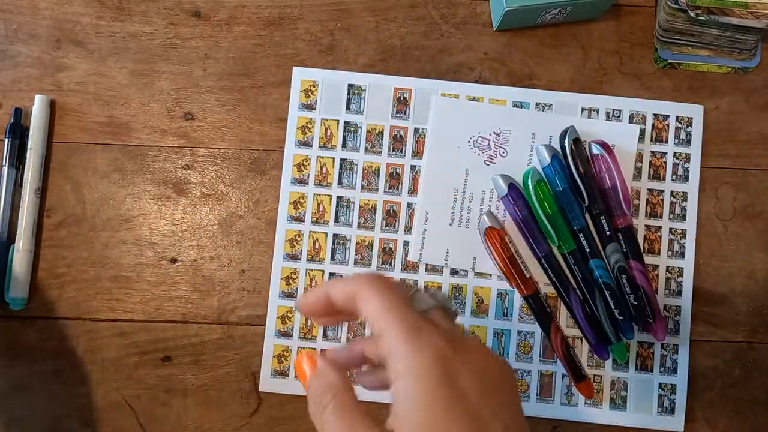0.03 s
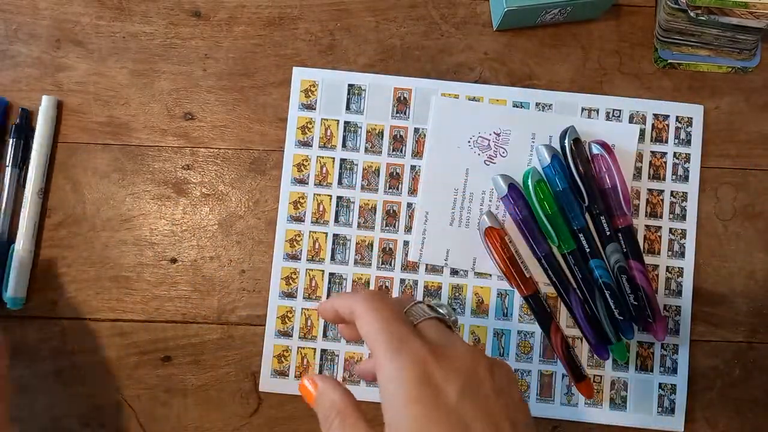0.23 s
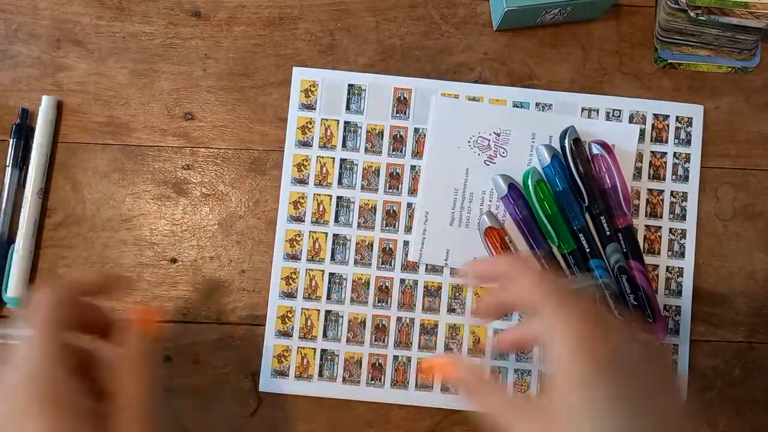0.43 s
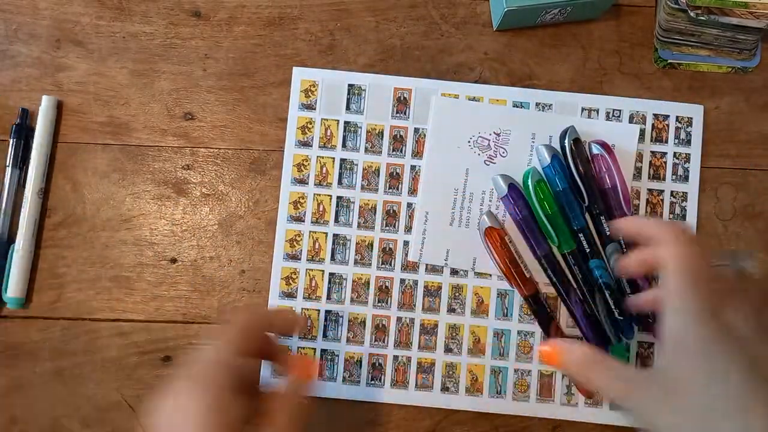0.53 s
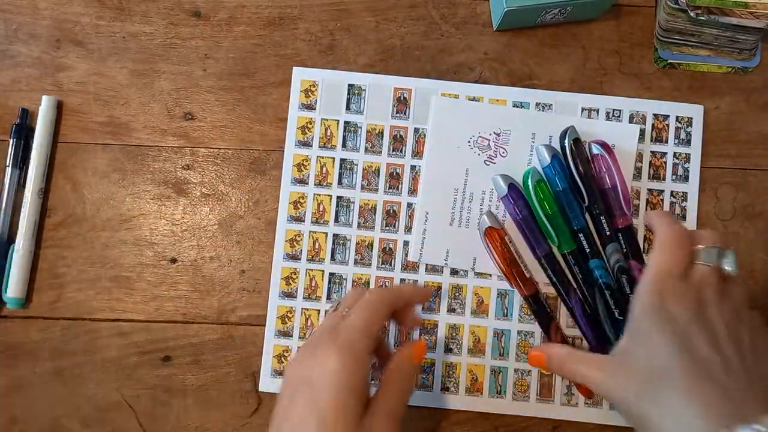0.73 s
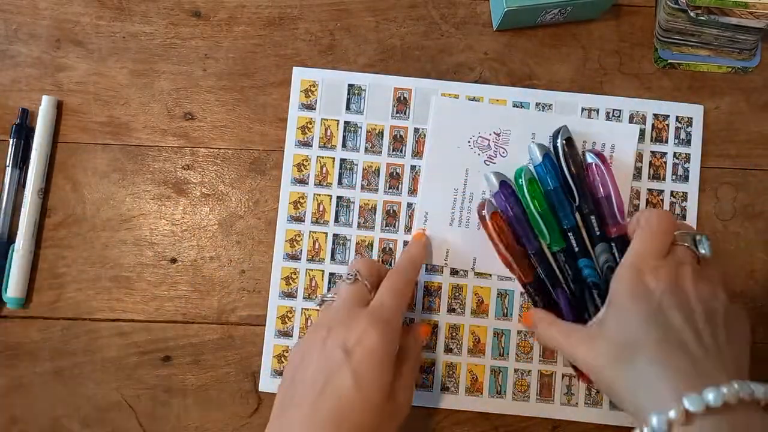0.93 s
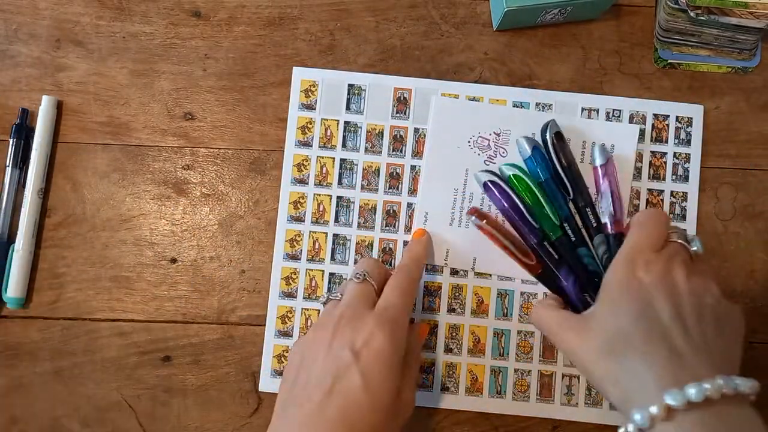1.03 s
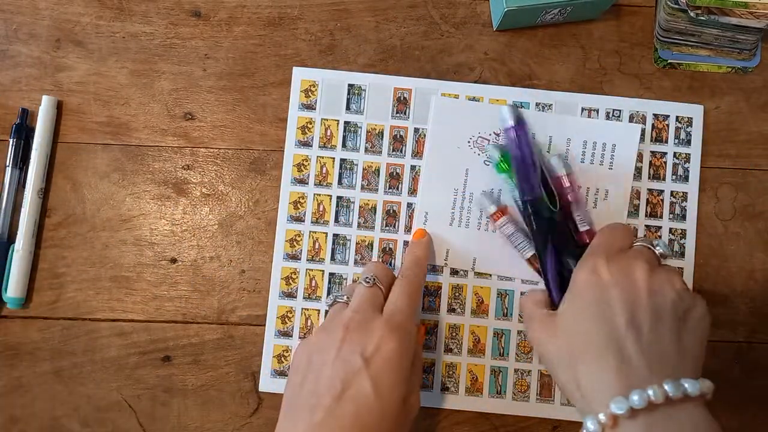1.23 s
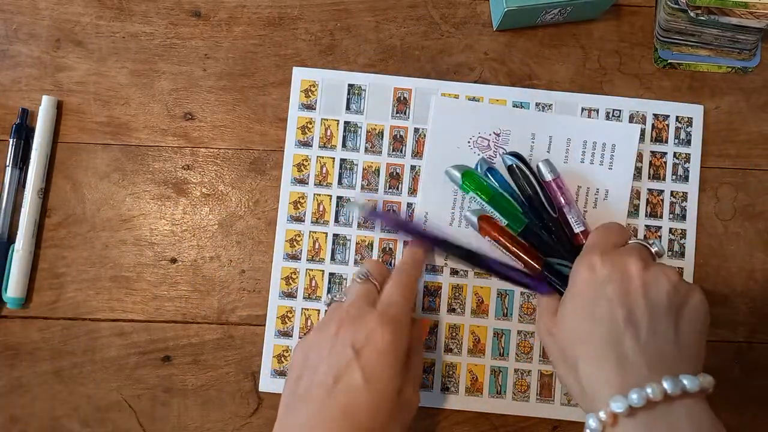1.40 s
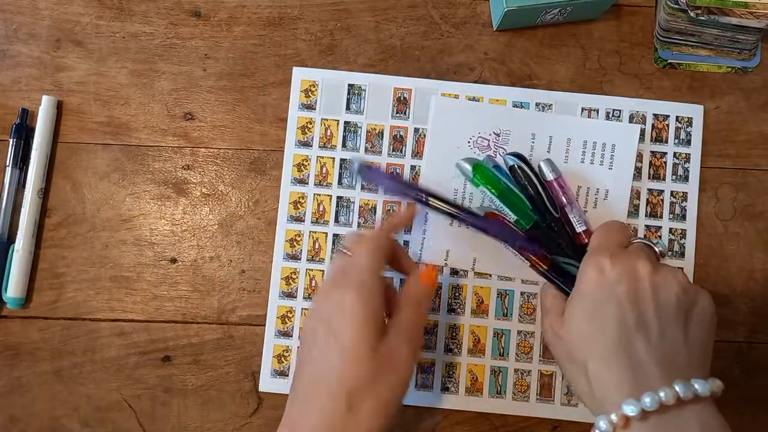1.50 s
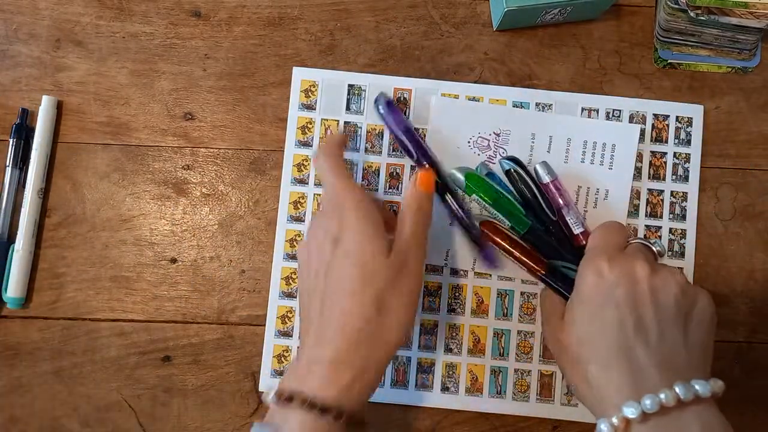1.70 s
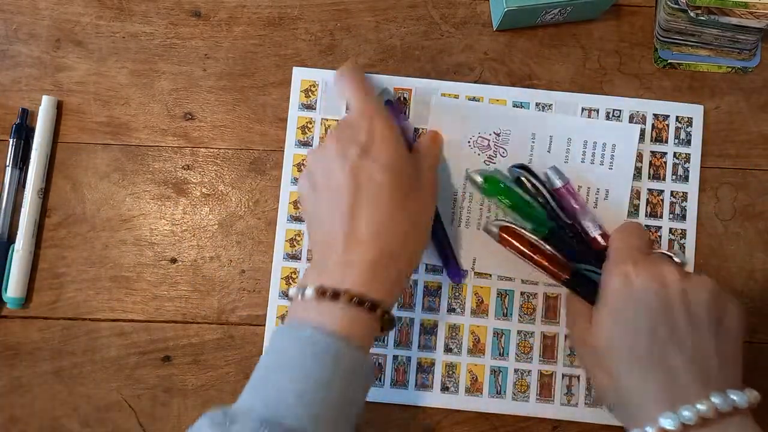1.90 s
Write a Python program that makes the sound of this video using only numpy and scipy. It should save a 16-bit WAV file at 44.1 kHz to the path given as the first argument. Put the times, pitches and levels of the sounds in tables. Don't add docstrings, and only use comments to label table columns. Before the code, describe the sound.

A bunch of plastic pens clicks and rattles together as hands gather it on a table

```python
import sys
import numpy as np
from scipy import signal
from scipy.fft import rfft, irfft, next_fast_len
from scipy.io import wavfile
from scipy.ndimage import uniform_filter1d

SR = 44100
rng = np.random.default_rng(int(sys.argv[2]) if len(sys.argv) > 2 else 0)


def amplitude_ratio(level_db):
    exponent = np.asarray(level_db, float) / 20
    return 10 ** exponent


def transcribe(u):
    v = np.clip(np.atleast_2d(u).T, -1, 1)
    q = np.round(v * 32767).astype(np.int16)
    wavfile.write(sys.argv[1], SR, q)


N = 85995

RISE_S = 0.0046
SCATTER_DB = 6


def curve(hz, points):
    points = np.array(points, float)
    return np.interp(np.log(np.maximum(hz, 1)), np.log(points[:, 0]), points[:, 1])


def colour(x, gain):
    n = next_fast_len(x.shape[-1] + 4096)
    spectrum = rfft(x, n) * gain(np.arange(n // 2 + 1) * SR / n)
    return irfft(spectrum, n)[..., :x.shape[-1]]


def unit(x):
    return x / np.sqrt(np.mean(x ** 2))


def ring(modes, chance, size=8192):
    hz, db, t60 = np.array(modes, float).T[:, :, None]
    t = np.arange(size) / SR
    strength, detune = chance[:2 * len(modes)].reshape(2, -1, 1)
    pitch = np.minimum(hz * (1 + 0.026 * detune), 0.45 * SR)
    decay = np.exp(-np.log(1000) * t / t60)
    return (amplitude_ratio(db + SCATTER_DB * strength) * np.sin(2 * np.pi * pitch * t) * decay).sum(0)


def add(out, s, db, sound):
    i = int(max(s, 0) * SR)
    peak = np.abs(np.atleast_2d(sound).mean(0)).max()
    out[..., i:i + sound.shape[-1]] += (amplitude_ratio(db) * sound / peak)[..., :N - i]


def scrape(chance, rise_s, fall_s):
    t = np.arange(len(chance)) / SR
    return chance * np.abs(chance) * (1 - np.exp(-t / rise_s)) * np.exp(-t / fall_s)


def push(modes, contact_s, chance, size=8192):
    return signal.fftconvolve(np.hanning(int(contact_s * SR) + 3), ring(modes, chance, size))


def click(modes, chance, crack_db, rise_s, fall_s):
    unlike = 0.64
    body = np.array([ring(modes, chance[:20] + side * unlike * chance[20:40], size=700) for side in (1, -1)])
    body[:, 0] += amplitude_ratio(crack_db + SCATTER_DB * chance[[0, 1]])
    shared = scrape(chance[40:440], rise_s, fall_s)
    apart = scrape(chance[440:], rise_s, fall_s)
    burst = shared + unlike * apart * np.array([[1], [-1]])
    burst[:, int(0.0006 * SR)] += 1.266 * np.abs(burst).max()
    return signal.fftconvolve(burst, body, axes=1)


def wide(x):
    side = colour(x[1], lambda f: f / np.hypot(f, 480))
    return np.array([x[0] + side, x[0] - side])


def air():
    # (frequency [Hz], level per Hz [dB])
    tone = [(55, 0.5), (110, -0.5), (200, -13), (500, -20), (1300, -25.5), (4800, -23), (6500, -33.5),
            (15000, -52.5)]
    # (frequency [Hz], level [dB])
    hum = [(50, -63), (100, -70)]
    t = np.arange(N) / SR
    hiss = unit(colour(wide(rng.standard_normal((2, N))), lambda f: amplitude_ratio(curve(f, tone))))
    return amplitude_ratio(-64) * hiss + sum(amplitude_ratio(db) * np.sin(2 * np.pi * hz * t) for hz, db in hum)


def brush(start_s, attack_s, hold_s, release_s, hz, width, db):
    t = np.arange(N) / SR - start_s
    env = np.clip(t / attack_s, 0, 1) * np.exp(-np.maximum(t - attack_s - hold_s, 0) / release_s)
    grain = amplitude_ratio(4.5 * unit(uniform_filter1d(rng.standard_normal(N), 300)))
    band = unit(colour(rng.standard_normal(N), lambda f: 1 / (1 + ((f - hz) / width) ** 2)))
    return amplitude_ratio(db) * env * grain * band


def brushes():
    # (start [s], attack [s], hold [s], release [s])
    strokes = [
        (.632, .03, .03, .05),
        (0, .03, .04, .03),
        (.45, .08, .07, .05),
        (0, .01, .06, .05),
        (1.06, .15, .12, .03),
    ]
    # (centre [Hz], width [Hz], level [dB])
    bands = [(630, 116, -65.5), (2225, 140, -73), (10100, 1700, -82.5), (12000, 2600, -85.5),
             (684, 570, -58)]
    return sum(brush(*stroke, *band) for stroke, band in zip(strokes, bands))


def pens():
    # (time [s], peak [dB], main ring [Hz], treble share [dB], low ring share [dB])
    clicks = [(0.149, -48.5, 5400, -17, -8.5), (0.851, -42, 5680, -25, -16),
              (0.8752, -25.5, 4030, -14, -15), (0.8868, -26, 6150, -11, -19.5),
              (0.9088, -23, 5900, -16.5, -38), (0.93, -47, 3800, -19, -15),
              (1.0376, -21.5, 5370, -9.5, -11), (1.05, -22, 5430, -7.5, -30), (1.072, -23, 5370, -20, -14),
              (1.0786, -22.5, 5440, -17.5, -18), (1.0932, -27, 3700, -14, -26),
              (1.1625, -24, 4800, -26, -27), (1.1672, -20.5, 4170, -22, -25), (1.1763, -24, 3950, -15, -29),
              (1.1844, -26, 7450, -19, -24), (1.2048, -21.5, 3980, -20, -22), (1.2285, -18, 3980, -21, -24),
              (1.2422, -28, 4130, -12, -27), (1.2763, -17, 5770, -10, -39), (1.2846, -17, 5720, -18, -38),
              (1.3079, -32, 4860, -19, -20), (1.338, -28, 3970, -3, -34), (1.3603, -37, 4660, -8, -27),
              (1.3803, -28, 5240, -8, -35), (1.3921, -31, 5340, 11, -35), (1.4466, -31.5, 4550, -15, -19),
              (1.504, -20.5, 5330, -13, -23.5), (1.7, -44.5, 5100, -13, -36),
              (1.7675, -34, 3300, -18.5, -27), (1.8106, -44, 4080, -5, -27)]
    # (time [s], peak [dB], main ring [Hz], treble share [dB], low ring share [dB])
    further_clicks = [(0.2161, -32.5, 10700, -8, -12), (0.1906, -31, 3360, 2, -29), (.858, -45, 5800, -14, -32),
                      (0.908, -28.5, 5900, -5, -20), (1.0373, -26, 1750, -23, -34), (1.105, -41, 4500, -18, -19),
                      (1.134, -32, 4930, -12, -30), (1.217, -31, 4460, -13, -19), (1.236, -23, 5030, -3, -21),
                      (1.268, -28, 4360, -18, -20), (1.275, -21, 8020, 1, -28), (1.2876, -24, 6150, -28, -39),
                      (1.295, -23, 4070, -22, -26), (1.498, -32, 5000, 3, -1), (1.511, -25, 3630, 3, -39),
                      (1.875, -63, 12000, -4, -26), (1.911, -47, 3850, -19, -17)]
    # (time [s], peak [dB], main ring [Hz], treble
    # share [dB], low ring share [dB])
    aimed = [(0.875, -29, 5600, -14, -26), (1.0375, -28, 5470, -13, -26), (1.2057, -26, 4050, -8, -26),
             (1.2282, -25, 7870, -15, -18), (1.7676, -35.5, 4800, -17, -16)]
    # (time [s], chatter level [dB])
    grip = [(.89, -42), (1.02, -50.5), (1.06, -35.5), (1.13, -51.5), (1.2, -42), (1.3, -33.5), (1.36, -74),
            (1.42, -96), (1.5, -57.5), (1.57, -104)]
    # (frequency [Hz], level [dB], t60 [s])
    barrel = [(1750, 2, 0.0039), (2320, 2, 0.0014), (3230, -14, 0.016), (4370, -2.5, 0.0025),
              (5470, 6, 0.0021), (7960, -5.5, 0.0017), (9480, -18.5, 0.0061), (11880, -1.5, 0.00063),
              (13700, -20, 0.00074)]
    # (frequency [Hz], level [dB])
    pen_glow = [(500, -14), (1100, -16.5), (1600, -10.5), (3000, -4.5), (5400, 2.5), (8000, -7.5),
                (14000, -21.5)]
    usual_treble_db, usual_low_db = -15, -21.5
    chatter_per_s, chatter_spread_db = 400, 2

    loose = rng.random((int(chatter_per_s * N / SR), 3))
    times = loose[:, 0] * N / SR
    levels = np.interp(times, *np.array(grip).T, left=-120)
    levels = levels - chatter_spread_db * np.log(loose[:, 1] + 0.062)
    pitches = 3800 + 2400 * loose[:, 2]
    chatter = [(s, db, hz, usual_treble_db, usual_low_db) for s, db, hz in zip(times, levels, pitches)]

    out, glow = np.zeros((2, N)), np.zeros(N)
    for contacts, wet_db in ((clicks, 0), (further_clicks, 0), (aimed, -15), (chatter, 0)):
        for s, db, hz, treble_db, low_db in contacts:
            chance = rng.standard_normal(840)
            chance[:20] *= 0.55
            bright_db = (treble_db - usual_treble_db) / 2
            modes = [(hz, 3.0, 0.0065)]
            for f, level, t60 in barrel:
                level = level + bright_db * np.log2(max(f / 4000, 1))
                level = level + (low_db - usual_low_db) * (f < 2500)
                modes.insert(-1, (f, level, t60))
            add(out, s, db, click(modes, chance, 8.5 + bright_db, RISE_S, 0.0012))
            add(glow, s, db + wet_db, np.array([1, -np.tanh(bright_db / 8)]))
    out = colour(out, lambda f: (1j * f / (1205 + 1j * f)) ** 6)
    return out, colour(glow, lambda f: amplitude_ratio(curve(f, pen_glow)))


def table():
    # (time [s], level [dB], contact [s])
    thumps = [(0.193, -33.5, 0.00081), (0.206, -28.5, 0.00012), (0.22, -23.5, 0.0014), (.229, -41, 0.00082),
              (0.251, -24.5, 0.0027), (.275, -25.5, 0.0056), (0.958, -49, 0.0039), (1.062, -34.5, 0.011),
              (1.084, -37.5, 0.0065), (1.106, -42.5, 0.005), (1.131, -41.5, 0.0034), (1.162, -35, 0.00067),
              (1.204, -32, 0.00073), (1.232, -27.5, 0.00035), (1.255, -29, 0.00093), (1.278, -28.5, 0.0024),
              (1.30, -34, 0.00081), (1.318, -32, 0.00073), (1.338, -44, 0.0012), (1.359, -37, 0.0042),
              (1.378, -41, 0.0042), (1.448, -30.5, 0.00099), (1.452, -28, 0.0093), (1.466, -26.5, 0.0068),
              (1.483, -33, 0.0028), (1.501, -25, 0.0044), (1.517, -41, 0.0022), (1.536, -40, 0.0026),
              (1.55, -44, .003), (1.569, -57, 0.0022), (1.773, -36, 0.0068), (1.793, -37.5, 0.006),
              (1.811, -39.5, 0.0039), (1.884, -35, 0.0068), (1.907, -45, 0.0043), (1.933, -51, 0.0025)]
    # (frequency [Hz], level [dB], t60 [s])
    top_modes = [(77.5, -9.5, 0.13), (105.6, -3, 0.14), (134, -6.5, 0.13), (151.7, -4.5, 0.17),
                 (210, -4, 0.076), (234.8, -0.5, 0.16), (293, -4, 0.036), (352, -20.5, 0.041),
                 (594, -13, 0.05)]
    out = np.zeros(N)
    for s, db, contact_s in thumps:
        add(out, s, db, push(top_modes, contact_s, rng.standard_normal(30) * 0.77, size=12000))
    return colour(out, lambda f: (1j * f / (58 + 1j * f)) ** 2)


def set_down():
    # (time [s], hollow level [dB], snap level [dB])
    contacts = [
        (0.194, -43.5, -39),
        (.208, -34.5, -37.5),
        (.222, -25.5, -67),
        (.231, -40, -41),
        (.25, -32.5, -64),
        (.262, -32, -50),
        (.2700, -33, -17),
        (.276, -31, -33),
    ]
    # (frequency [Hz], level [dB], t60 [s])
    hollow_modes = [(758, 0, 0.13), (887, 3.5, 0.054), (1024, 0, 0.082), (1061, 3, 0.14),
                    (1245, -11, 0.053), (1790, -6, 0.029), (2116, -12, 0.036)]
    # (frequency [Hz], level [dB], t60 [s])
    snap_modes = [(2040, 3, 0.054), (2600, -56, 0.0055), (3210, 11, 0.022), (3730, 16, 0.0027),
                  (4580, 5, 0.0083), (5900, -7, 0.0013), (7530, -29, 0.001), (10900, -15, .002)]
    # (frequency [Hz], level [dB])
    snap_glow = [(700, 2.5), (1200, 7.5), (3500, 13), (5200, 10), (7000, -3), (13000, -20.5)]
    hollow, snap, glow = np.zeros(N), np.zeros((2, N)), np.zeros(N)
    for s, db, snap_db in contacts:
        chance = rng.standard_normal(840)
        rattle = np.diff(scrape(chance[40:440], 0.00018, 0.0024))
        add(hollow, s, db, signal.fftconvolve(rattle, ring(hollow_modes, chance * 0.69)))
        add(snap, s, snap_db, click(snap_modes, chance, 0, RISE_S, 0.0013))
        add(glow, s, snap_db, np.ones(1))
    return hollow + snap, amplitude_ratio(-20) * hollow + colour(glow, lambda f: amplitude_ratio(curve(f, snap_glow)))


def box():
    # (time [s], level [dB], pitch factor [1])
    knocks = [
        (.637, -59.5, 1.01),
        (.649, -52.5, 1.08),
        (.662, -45.5, 0.91),
        (.672, -47, 1.02),
        (.692, -55, 1.17),
        (.701, -54, 0.84),
        (0.717, -60, 1),
        (.724, -56, 0.94),
        (.748, -64, 0.99),
        (.785, -76, 1.02),
    ]
    # (frequency [Hz], level [dB], t60 [s])
    box_modes = [(525, -12.5, .06), (597, -4.5, 0.13), (656, 2.5, .16), (727, 0.5, 0.068),
                 (900, -22, 0.033)]
    out = np.zeros(N)
    for s, db, pitch in knocks:
        modes = [(f * pitch, level, t60) for f, level, t60 in box_modes]
        add(out, s, db, push(modes, 0.00091, rng.standard_normal(30) * 0.52))
    return out


def room(x):
    # (frequency [Hz], t60 [s], level [dB])
    bands = [(146, 0.46, 1.5), (467, 0.44, 5.5), (1060, 0.44, 6.5), (4070, 0.44, 1), (7600, 0.37, -4),
             (13700, 0.3, 1.5)]
    t = np.arange(SR // 2) / SR
    noise, tail = wide(rng.standard_normal((2, len(t)))), 0
    for k, (_, t60, db) in enumerate(bands):
        share = [(row[0], j == k) for j, row in enumerate(bands)]
        band = colour(noise, lambda f: curve(f, share))
        tail = tail + amplitude_ratio(db) * band * np.exp(-np.log(1000) * t / t60) / np.sqrt(t60 * SR / 14)
    build = 1 - np.exp(-(t / 0.005) ** 2)
    return signal.fftconvolve(x[None], tail * build, axes=1)[:, :N]


def scene():
    bunch, bunch_glow = pens()
    top = table()
    thing, thing_glow = set_down()
    hands = brushes() + box()
    near = bunch + top + thing + hands
    near[0] = colour(near[0], lambda f: np.exp(-2j * np.pi * f * 0.00005))
    to_walls = 3 * (bunch_glow + thing_glow) + amplitude_ratio(-8.5) * hands + amplitude_ratio(-11) * top
    return near + room(to_walls) + air()


def band_limit(x):
    return signal.sosfilt(signal.butter(12, 16820, fs=SR, output="sos"), x)


def record(dry):
    # (frequency [Hz], level [dB])
    mic = [(1000, 2), (5600, 2.5), (6300, 2.5), (7500, 9.5), (9500, 8), (12000, 12.5)]
    # (frequency [Hz], left minus right [dB])
    ports = [(110, 2.5), (400, -3.5), (2400, 0.5), (4400, -2), (8100, 1.5), (15000, 3.5)]

    def port(f, side):
        low_cut = (1j * f / (50 + 1j * f)) ** 4
        return amplitude_ratio(curve(f, mic) + side * curve(f, ports) / 2) * (f < 15900) * low_cut

    left = colour(dry[0], lambda f: port(f, 1))
    right = colour(dry[1], lambda f: port(f, -1))
    return band_limit(np.array([left, right]))


dry = scene()
out = record(dry)
transcribe(out)
```